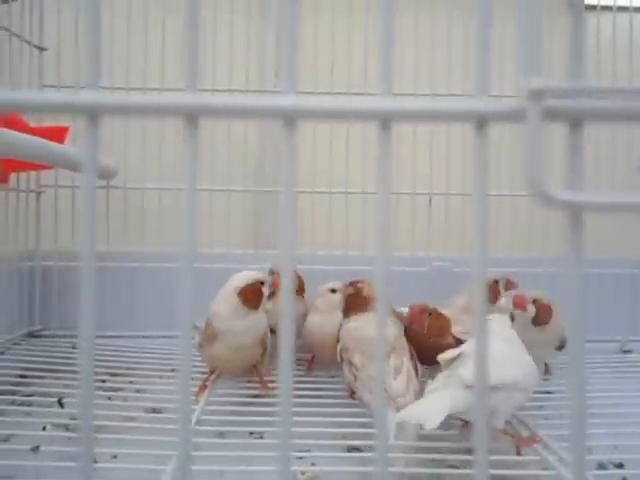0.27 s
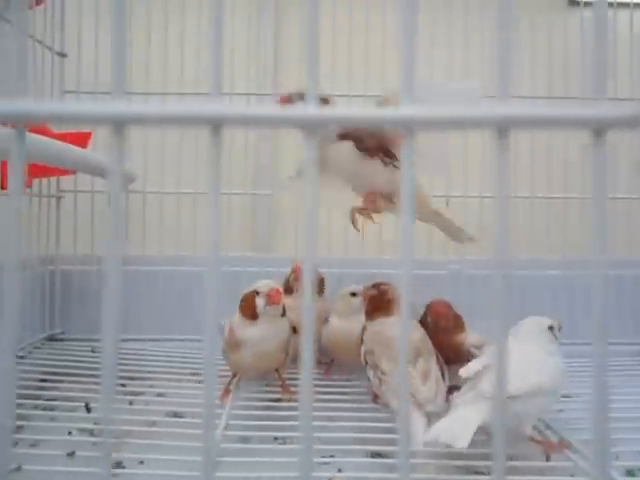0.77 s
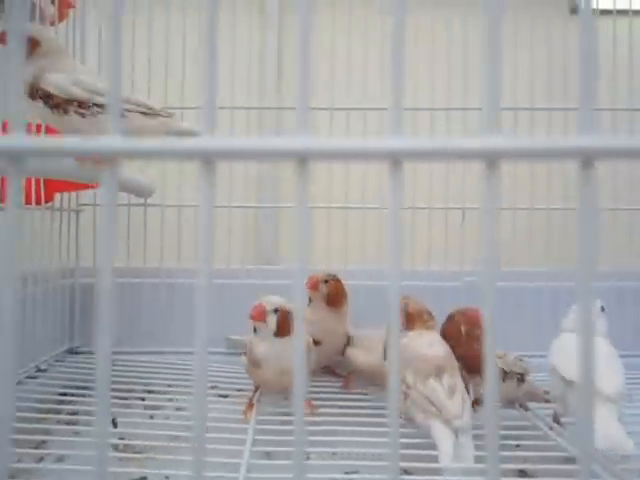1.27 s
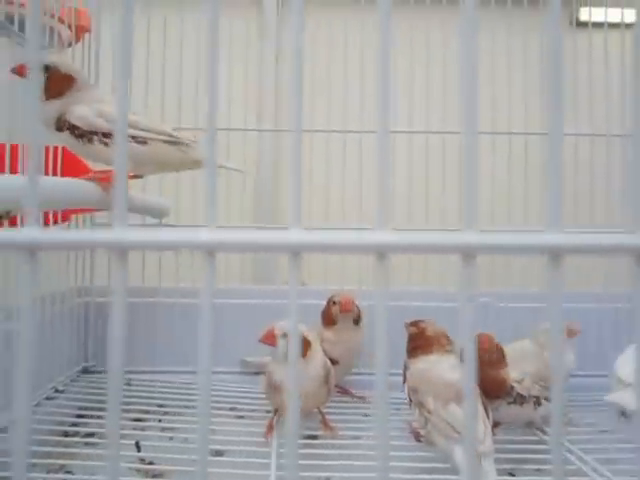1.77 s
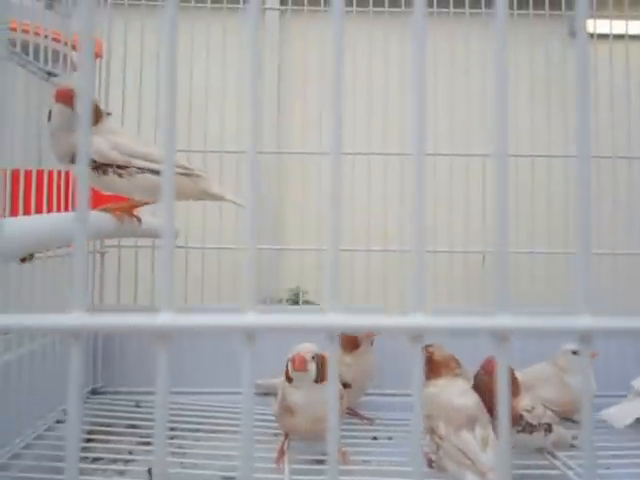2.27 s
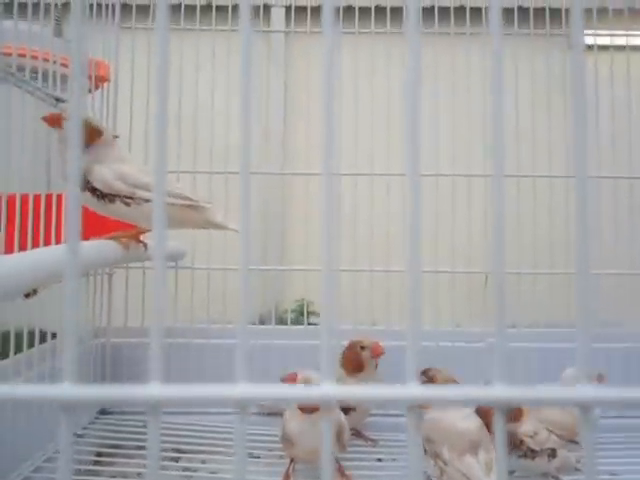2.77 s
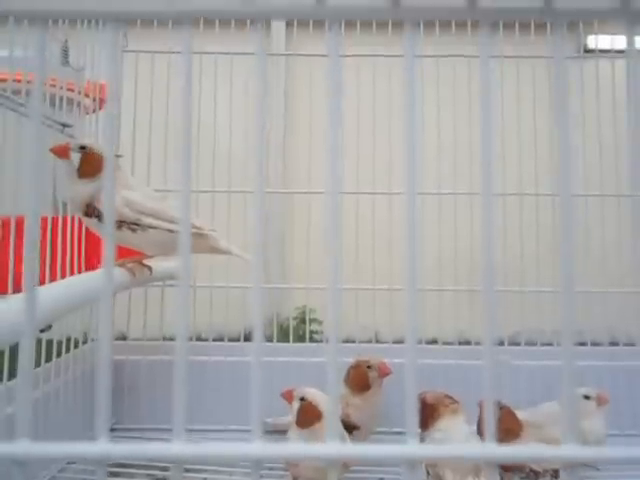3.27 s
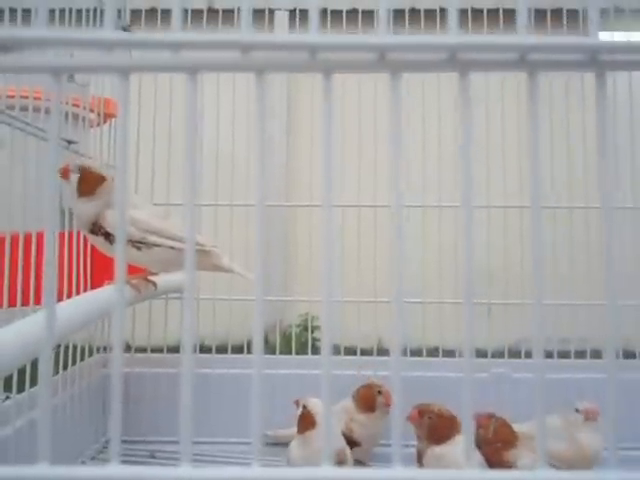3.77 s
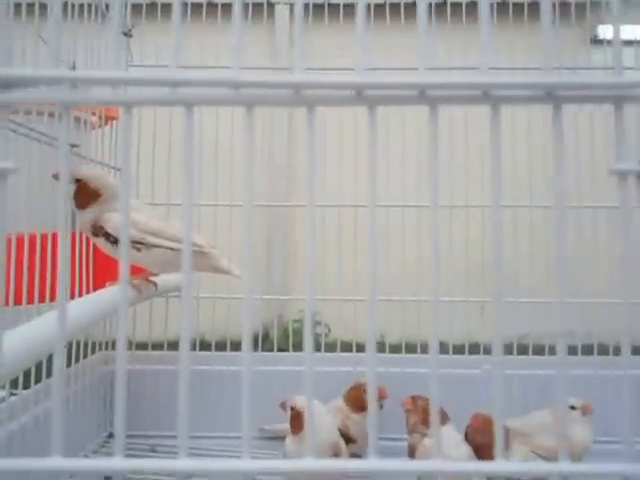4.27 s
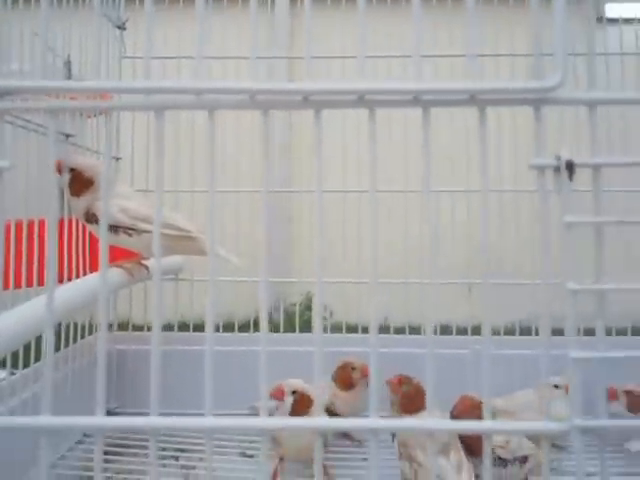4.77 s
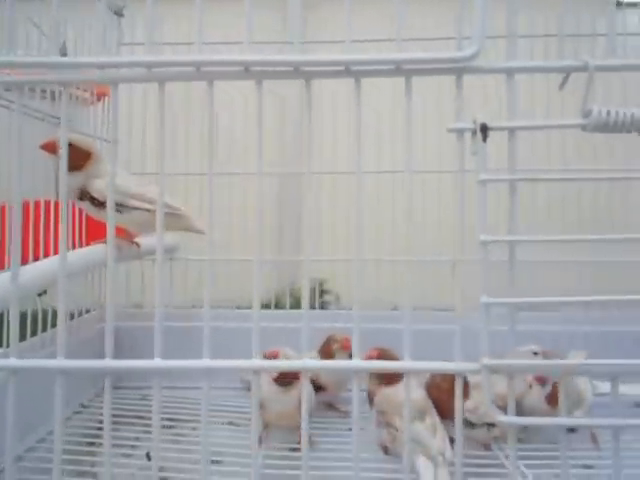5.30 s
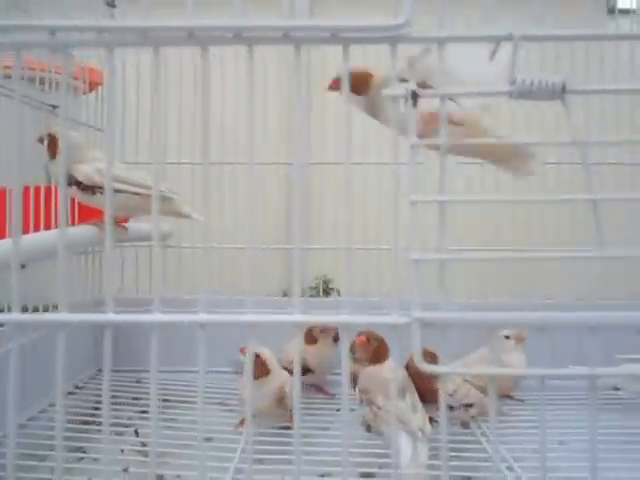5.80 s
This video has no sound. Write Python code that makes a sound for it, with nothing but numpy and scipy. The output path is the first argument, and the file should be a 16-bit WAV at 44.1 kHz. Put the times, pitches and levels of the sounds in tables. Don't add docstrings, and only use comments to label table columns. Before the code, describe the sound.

In a metal cage inside a bird shop, small finches give soft contact notes and sharp, nasal falling calls. Feet click on ringing wires and a bird flutters up early on. A larger bird rattles briefly in the background, others warble and twitter hoarsely, and the end crowds with overlapping calls and a second, stronger wing flutter. Low fan rumble and mains hum throughout; close, dull cheap camera microphone.

```python
import sys
import numpy as np
from scipy import signal
from scipy.fft import rfft, irfft
from scipy.io import wavfile
from scipy.ndimage import uniform_filter1d

SR = 44100
rng = np.random.default_rng(int(sys.argv[2]) if len(sys.argv) > 2 else 0)


def unload_wav(signal):
    wavfile.write(
        sys.argv[1],
        SR,
        np.round(np.clip(np.atleast_2d(signal).T, -1, 1) * 32767).astype(np.int16),
    )


def elevation(decibels):
    levels = np.asarray(decibels, float)
    return 10 ** (levels / 20)


N = 266364

# freq_hz, gain_db
ARCH_THROAT = [(410, -55), (700, -16.5), (1490, -16), (3170, 3), (3900, -5.5), (4250, 0), (4710, -16.5),
               (5450, -17), (7080, -60.5), (12000, -120)]


def curve(table):
    s, *columns = np.transpose(table)
    at = np.arange(int(s[0] * SR), min(int(s[-1] * SR), N))
    return at, [np.interp(at / SR, s, c) for c in columns]


def colour(points, hz):
    f, db = np.transpose(points)
    return elevation(np.interp(np.log(np.maximum(hz, 1)), np.log(f), db))


def walk(rate_hz, size=N):
    k = max(int(SR / rate_hz), 2)
    held = np.repeat(rng.standard_normal(size // k + 3), k)
    return 1.33 * uniform_filter1d(uniform_filter1d(held, k), k)[k:k + size]


def unit(x):
    return x / np.sqrt(np.mean(x ** 2))


def voice(calls, throats, wobble, rasp, flutter_db, chaos=0., lock_s=.014):
    out = np.zeros(N)
    k = np.arange(1, 15)[:, None]
    for table, throat in zip(calls, throats):
        at, (period_s, db) = curve([(s, 1 / hz, db) for s, hz, db in table])
        unlocked = chaos * (table[0][1] > 900) * np.exp(-((at - at[0]) / SR / lock_s) ** 4)
        scatter = 1 + wobble * walk(300, len(at)) + unlocked * walk(1800, len(at))
        hz = scatter / uniform_filter1d(period_s, size=260)
        gains = colour(throat, k / period_s) * (k / period_s < 5500)
        gains = gains / np.sqrt(np.sum(gains ** 2, axis=0) / 2)
        gains = gains * elevation(flutter_db * np.array([walk(90, len(at)) for _ in k]))
        phase = 2 * np.pi * np.cumsum(hz) / SR
        tone = np.sum(gains * np.cos(k * phase + .15 * k ** 2), axis=0)
        out[at] += elevation(db) * tone * (1 + rasp * walk(1500, len(at)))
    return out


def fall(row, rise_s, hold_s, glide, early, length_s, release_s, scoop, sag, droop,
         start_db, top_db, held_db, half_db, floor_db, last_db, fade_db, end_db):
    s, top, floor, db, slowness = row
    let_go, rest = s + rise_s + hold_s, floor * sag
    end = let_go + length_s * slowness
    fall_s = (1 / floor - 1 / top) * 1000 / glide * slowness
    half_hz = 1 / ((1 - early) / top + early / floor)
    return [(s, top * scoop, db + start_db),
            (s + rise_s, top, db + top_db),
            (let_go, top, db + held_db),
            (let_go + fall_s / 2, half_hz, db + half_db),
            (let_go + fall_s, floor, db + floor_db),
            (end, rest, db + last_db),
            (end + release_s / 2, rest * (1 + droop) / 2, db + fade_db),
            (end + release_s, rest * droop, db + end_db)]


def note(row, attack_s, release_s, scoop, bow, droop, start_db, end_db):
    s, length, first, last, db = row
    return [(s, first * scoop, db + start_db),
            (s + attack_s, first, db),
            (s + length / 2, bow * (first + last) / 2, db),
            (s + length - release_s, last, db),
            (s + length, last * droop, db + end_db)]


def slides(table, hoarse):
    out = np.zeros(N)
    for s, length, first, last, db in table:
        at, (share,) = curve([(s, 0), (s + length, 1)])
        wobble, rasp = walk(1500, 2000)[:len(at)], walk(700, 2000)[:len(at)]
        hz = (first + (last - first) * share) * (1 + hoarse * wobble)
        swell = elevation(db + 3.5 + 60 * hoarse * rasp) * np.sin(np.pi * share)
        out[at] += swell * np.sin(2 * np.pi * np.cumsum(hz) / SR)
    return out


def shop():
    # freq_hz, level_db_per_hz
    air_db = [(8.2, -39.5), (14, -6.5), (27, -1.5), (49, -3), (91, -3.5), (123, -8.5), (146, -12),
              (241, -14.5), (273, -18), (309, -18.5), (407, -21.5), (882, -26), (1350, -32.5),
              (2920, -39.5), (5450, -46.5), (7080, -82.5), (12000, -120)]
    # freq_hz, level_db, wander_hz
    hum = [(58.44, -33.5, 3.614), (119.8, -29, 0.3), (239.3, -47, 1.5)]
    hz = np.arange(N // 2 + 1) * SR / N
    air = rfft(rng.standard_normal(N)) * colour(air_db, hz)
    out, swell = 0, walk(0.83)
    for step in range(-1, 19):
        share = np.clip(1 - np.abs(2 * np.log2(np.maximum(hz, 1) / 14) - step), 0, 1)
        out = out + irfft(air * share, N) * elevation(0.63 * swell + 0.83 * walk(6))
    lines = np.zeros(N)
    for f, db, wander in hum:
        level = elevation(db + 0.5 + 0.83 * walk(4.8))
        lines += level * np.sin(2 * np.pi * np.cumsum(f + wander * walk(5)) / SR)
    return elevation(-28.5) * unit(out) + lines


def soft_contacts():
    # start_s, length_s, first_hz, last_hz, level_db
    contacts = [
        (0.102, 0.066, 474.6, 486, -35),
        (.86, .064, 416.4, 405.4, -37.5),
        (1.946, 0.11, 451.7, 448, -36.5),
        (4.753, .09, 443.6, 454, -39),
        (5.677, 0.11, 429, 435, -38.5),
        (1.763, .11, 495, 478.5, -41),
    ]
    bows = [1.035, .99, 1.045, 1.04, .98, 1.005]
    shape = dict(attack_s=.014, release_s=0.018, scoop=0.92, droop=.92, start_db=-6.5, end_db=-7)
    # freq_hz, gain_db; the first also serves the last note
    throats = [
        [(260, -47.5), (450, -7), (984, -7), (1200, -16), (1480, -10), (1640, -21), (1920, -2.5), (2470, -3),
         (2770, -19), (3370, -4.5), (3740, -18.5), (4560, -7), (5450, -26), (7080, -60.5), (12000, -120)],
        [(260, -34.5), (450, -5.5), (1010, -1), (1100, -7), (1770, -9), (2000, -2), (3300, -9), (5450, -20),
         (7080, -54), (12000, -120)],
        [(260, -33), (450, -11), (655, -14.5), (944, -2.5), (1080, -17), (2360, -5.5), (2600, -14),
         (5450, -16.5), (7080, -49), (12000, -120)],
        [(260, -50), (450, -15.5), (934, 1.5), (1130, -9), (1430, -10.5), (1750, -21.5), (2360, 2), (2600, -13),
         (2820, -12.5), (5170, -14), (5450, -29.5), (7080, -59), (12000, -120)],
        [(260, -34), (450, -10), (1510, -22), (1680, -5), (2390, -2.5), (3010, -1), (4290, -6.5), (5450, -22),
         (7080, -61.5), (12000, -120)],
    ]
    calls = [note(r, bow=bow, **shape) for r, bow in zip(contacts, bows)]
    return voice(calls, throats + throats[:1], wobble=0.005, rasp=0.33, flutter_db=1.8)


def hops():
    # start_s, click_db, ring_db, ping_db
    landings = [
        (0.232, -26, -41.5, -67.5),
        (0.402, -23, -22.5, -29),
        (0.692, -25.5, -33, -50.5),
        (0.769, -27, -39, -57),
        (0.803, -22, -27.5, -64),
        (0.997, -26.5, -27.5, -50),
        (1.5079, -28, -42, -50),
        (2.599, -21.5, -26, -36),
        (5.107, -27, -51.5, -43.5),
    ]
    # freq_hz, level_db, t60_s
    frame = [(800, -10, .3), (945, -4, .7), (972, -1, 1.2), (994, -2, 1.6), (1021, -2, 1.3), (1050, -3, .9),
             (1085, -6, .5), (1450, -22, .4), (1960, -14, .8), (3330, -16, .5)]
    # freq_hz, level_db, t60_s
    thin_wires = [(2050, -18, .08), (2700, -22, .05), (3130, -20, .1), (3350, -22, .1), (4200, -22, .05)]
    # freq_hz, level_db, t60_s
    high_ping = [(4730, 0, .08)]
    out, t = np.zeros(N + SR), np.arange(SR) / SR
    claw = signal.butter(1, [900, 4200], "band", fs=SR)
    for s, click_db, ring_db, ping_db in landings:
        scratch = signal.lfilter(*claw, rng.standard_normal(SR))
        hit = elevation(click_db - 4.5) * scratch * (np.exp(-t / 0.0089) + 0.47 * np.exp(-t / 0.039))
        for modes, db in ((frame, ring_db - 14.0), (thin_wires, click_db), (high_ping, ping_db - 4.0)):
            for hz, mode_db, t60 in modes:
                luck = rng.standard_normal(3)
                buzz_db = 4 * walk(70, SR)
                level = elevation(db + mode_db + 1.5 * luck[0] + buzz_db - 60 * t / t60)
                hit += level * np.sin(2 * np.pi * hz * (1 + .004 * luck[1]) * t + .8 * luck[2])
        out[int(s * SR):int(s * SR) + SR] += hit * (1 - np.exp(-t / .0025))
    return out[:N]


def wings():
    # time_s, level_db
    flights = [
        [(0.76, -28), (0.872, -15), (0.926, -15), (0.98, -23.5), (1.006, -28), (1.04, -36)],
        [(5.76, -36), (5.822, -18), (5.878, -12), (5.918, -22), (5.982, -11.5), (6.04, -28)],
    ]
    beats_hz = [24.1, 21.1]
    start_turns = [0.29, 0.606]
    overtones_db = [5, -3.5, -11]
    out = np.zeros(N)
    for table, hz, turns in zip(flights, beats_hz, start_turns):
        at, (db,) = curve(table)
        phase = 2 * np.pi * (hz * (at - at[0]) / SR + turns)
        beat = sum(elevation(g) * np.cos((k + 1) * phase + 0.32 * k) for k, g in enumerate(overtones_db))
        out[at] = elevation(db) * unit(beat) * np.minimum(1, (at - at[0]) / 1500)
    return out


def burst(s, length, db, first, last):
    shares = np.array([0, 0.27, 0.73, 1])
    levels_db = db - 8 * np.array([1, 0, 0, 1])
    return np.transpose([s + length * shares, levels_db, first + (last - first) * shares])


def twitter():
    # start_s, length_s, level_db, first_hz, last_hz
    bursts = [(.765, 0.083, -42, 3200, 3100), (0.952, 0.055, -47, 4800, 4440),
              (0.996, 0.09, -46, 3500, 3750), (2.59, 0.025, -41.5, 3480, 3310),
              (2.622, 0.15, -51, 3280, 3365), (3.04, 0.16, -49.5, 3560, 3570),
              (3.15, .115, -47.5, 3690, 3430), (3.268, 0.15, -61, 3290, 3430), (5.223, .1, -43, 3300, 3600),
              (5.316, .08, -41, 3400, 4150), (5.429, .1, -42, 3200, 3650), (5.5, .12, -50, 3600, 3360),
              (4.85, 0.13, -48, 3300, 3266)]
    scatter = [.07, .07, .12, .12, .1, .08, .1, .1, .17, .17, .16, .14, .15]
    out, t = np.zeros(N), np.arange(500) / SR
    hoarse = walk(2500)
    for row, scale in zip(bursts, scatter):
        at, (db, hz) = curve(burst(*row))
        luck = rng.standard_normal((len(at) // 90, 3))
        for i, (pitch, slide, size) in zip(range(0, len(at), 90), luck):
            span = slice(at[i] - len(t) // 2, at[i] + len(t) // 2)
            bend = pitch + (1 + slide) * (t / t[-1] - .5) + .5 * hoarse[span]
            phase = 2 * np.pi * np.cumsum(hz[i] * np.exp(scale * bend)) / SR
            out[span] += elevation(db[i] + 5.0 + 3.8 * size) * np.hanning(len(t)) * np.sin(phase)
    return out


def far_chirps():
    # start_s, length_s, first_hz, last_hz, level_db
    hoarse_chirps = [(.958, 0.027, 4700, 4660, -45), (.982, .016, 4470, 4030, -45.5),
                     (1.008, 0.013, 3330, 3480, -44), (1.034, 0.015, 3300, 3800, -43),
                     (1.044, .014, 4140, 4330, -46), (1.055, 0.011, 3380, 3590, -47),
                     (1.115, 0.014, 3870, 3830, -48.5), (3.075, .014, 3910, 3620, -49),
                     (3.2, 0.025, 3810, 3690, -46.5), (4.858, 0.0097, 3050, 2180, -40.5),
                     (4.884, .03, 4630, 4680, -47.5), (4.92, .012, 2830, 2780, -42),
                     (4.922, 0.04, 4590, 4570, -48.5), (4.928, 0.011, 2960, 3700, -39),
                     (4.953, .008, 2690, 3700, -40), (4.962, 0.021, 2910, 2800, -40.5),
                     (5.218, .014, 3170, 3250, -47), (5.238, 0.021, 3050, 3620, -44),
                     (5.264, 0.015, 4350, 4980, -43), (5.277, 0.013, 4830, 4800, -42.5),
                     (5.328, .018, 2784, 3250, -41.5), (5.342, .018, 2720, 3830, -42),
                     (5.348, .02, 4165, 4500, -41.5), (5.413, 0.015, 3150, 3250, -45.5),
                     (5.432, 0.021, 2690, 3250, -42.5), (5.453, 0.02, 2940, 3790, -41.5),
                     (5.472, .018, 3350, 3980, -43), (5.486, 0.025, 3960, 3940, -44.5),
                     (5.513, 0.015, 4010, 3930, -45.5), (5.6, 0.013, 3250, 3190, -46.5),
                     (5.616, .012, 3260, 3180, -46)]
    return slides(hoarse_chirps, hoarse=.025)


def squeaks():
    # start_s, length_s, first_hz, last_hz, level_db
    short_slides = [(2.277, 0.0083, 4450, 4050, -25.5), (3.934, .009, 4100, 4250, -28.5),
                    (5.025, .005, 4700, 4000, -26), (5.107, .004, 1700, 2900, -29),
                    (5.018, .006, 2400, 4200, -36), (2.272, 0.0068, 2400, 4000, -36),
                    (1.2, .004, 3100, 3500, -38), (1.359, .004, 3100, 3800, -34),
                    (2.498, .004, 2700, 3700, -40.5), (2.502, .004, 2600, 3600, -39.5)]
    return slides(short_slides, hoarse=.01)


def low_finch():
    # start_s, top_hz, floor_hz, level_db, slowness (1 = usual pace)
    drops = [
        (1.359, 1075, 596, -17.5, 0.96),
        (2.501, 1130, 608, -17.5, 1.04),
        (4.308, 1073, 588.5, -24.5, 0.92),
        (5.764, 1090, 584, -15.5, 1.035),
    ]
    shape = dict(rise_s=0.0099, hold_s=.008, glide=20, early=0.46, length_s=0.068, release_s=.015, scoop=.94, sag=0.96, droop=.93, start_db=-17, top_db=-8, held_db=-0.5, half_db=-0.3, floor_db=-4.5, last_db=-5, fade_db=-10.5, end_db=-27)
    # freq_hz, gain_db
    throats = [
        [(320, -50), (550, -25), (800, -17), (1190, -11.5), (1570, -23), (2320, -21.5), (2950, -3.5),
         (3250, -7), (3570, 0.5), (3900, -10.5), (4300, -8.5), (4720, -14.5), (5450, -22.5), (7080, -45.5),
         (12000, -120)],
        [(320, -44), (550, -12.5), (1230, -8.5), (1540, -23), (1770, -19), (2340, -13), (2870, -5), (3040, 1.5),
         (3310, -0.5), (3860, -4), (4540, -11.5), (5000, -15.5), (5450, -29.5), (7080, -52), (12000, -120)],
        [(550, -11), (1100, 0.5), (1500, -17), (2050, -2), (2450, -15.5), (2900, 1), (3500, -1.5),
         (3800, -15.5), (4350, -1), (4700, -7.5), (4980, -20), (5200, -8.5), (5500, -18)],
        [(320, -44.5), (550, -24), (1130, -17.5), (2030, -16), (2760, -4), (2920, 1), (4670, -11.5),
         (5100, -15.5), (5450, -29.5), (7080, -40), (12000, -120)],
    ]
    return voice([fall(r, **shape) for r in drops], throats, wobble=0.0015, rasp=.07, flutter_db=1.27, chaos=.2)


def rattle():
    # start_s, pitch_hz, level_db, fundamental_db
    ticks = [(1.553, 1492, -40, -2), (1.57, 1450, -50, 2), (1.584, 1270, -39.5, -5.5),
             (1.6, 1574, -39.5, -4), (1.618, 1480, -39, -5), (1.636, 1507, -37, -3.5),
             (1.65, 1603, -37.5, -2), (1.666, 1624, -37, -2), (1.683, 1350, -39, -5),
             (1.699, 1424, -34, -6), (1.715, 1380, -34, -5.5), (1.733, 1428, -33, -6),
             (1.749, 1388, -35, -3), (1.765, 1450, -33.5, -4), (1.781, 1590, -32, -2),
             (1.798, 1570, -32, -0.5), (1.813, 1607, -31.5, -2.5), (1.829, 1334, -30, -6.5),
             (1.847, 1520, -31, -6), (1.865, 1227, -34.5, -2.5), (1.881, 1247, -34.5, -6),
             (1.898, 1297, -35, -7), (1.918, 1277, -39.5, -3)]
    partials_db = [-2.5, -10, -22]
    out = np.zeros(N)
    for s, hz, db, low_db in ticks:
        at, (share,) = curve([(s + .001, 0), (s + .009, 1)])
        wobble = walk(2000, 600)[:len(at)]
        puff = uniform_filter1d(np.diff(rng.standard_normal(601)), 6)[:len(at)]
        rise = .055 * (np.tanh(7 * share - 1.6) - .4)
        phase = 2 * np.pi * np.cumsum(hz * (1 + .035 * wobble + rise)) / SR
        stack = sum(elevation(g) * np.sin((k + 1) * phase) for k, g in enumerate([low_db] + partials_db))
        out[at] += elevation(db + 7) * share * (1 - share) ** 2 * 6 * (stack + 3 * puff)
    return out


def high_finch():
    # start_s, length_s, first_hz, last_hz, level_db
    arches = [
        (2.241, 0.039, 654, 703, -28.5),
        (3.899, 0.038, 774, 756, -25),
        (4.985, 0.039, 751, 738, -22),
        (5.893, 0.039, 747, 764, -24),
    ]
    # start_s, top_hz, floor_hz, level_db, slowness
    drops = [
        (2.284, 1125, 447, -18.5, 0.98),
        (3.944, 1061, 446, -22.5, 0.98),
        (5.030, 1136, 445, -18.5, 1.02),
        (5.928, 1172, 446.5, -18, 1.06),
    ]
    arch_shape = dict(attack_s=0.004, release_s=.008, scoop=0.83, bow=1.025, droop=0.93, start_db=-16, end_db=-11.5)
    fall_shape = dict(rise_s=.004, hold_s=.004, glide=21, early=.49, length_s=0.094, release_s=.019, scoop=.95, sag=1, droop=0.75, start_db=-5.5, top_db=-0.3, held_db=1.5, half_db=-0.5, floor_db=-4, last_db=-5.5, fade_db=-12.5, end_db=-30.5)
    # freq_hz, gain_db
    throats = [ ARCH_THROAT, [(260, -42.5), (450, -22), (750, -20.5), (1290, -22), (2150, -7), (2710, -5),
               (3340, -7), (4070, -3), (4470, -21), (5450, -33.5), (7080, -68.5), (12000, -120)],
               ARCH_THROAT, [(260, -42), (450, -34), (698, -28), (1360, -22), (1660, -25.5), (2200, -13.5),
               (3170, -5.5), (3520, -8.5), (4470, -15.5), (5450, -27.5), (7080, -48.5), (12000, -120)],
               ARCH_THROAT, [(260, -51), (450, -19.5), (878, -11), (1200, -14.5), (1680, -6.5), (2180, 1),
               (2470, -5.5), (2650, 3), (4030, 6.5), (5450, -30.5), (7080, -66), (12000, -120)],
               ARCH_THROAT, [(260, -49), (450, -26.5), (1140, -16), (2090, -10), (2490, 0.5), (3010, 1.5),
               (3780, 2), (4560, -7.5), (5010, -9.5), (5450, -15), (7080, -37), (12000, -120)], ]
    calls = []
    for arch, drop in zip(arches, drops):
        calls += [note(arch, **arch_shape), fall(drop, **fall_shape)]
    return voice(calls, throats, wobble=0.0016, rasp=.07, flutter_db=1.35, chaos=.2, lock_s=.005)


def warbler():
    # start_s, length_s, first_hz, last_hz, level_db
    whistles = [(4.84, .028, 3330, 3100, -34.5), (4.871, 0.031, 3420, 3360, -38),
                (4.888, .033, 2640, 2900, -33), (4.934, .036, 3000, 3600, -42),
                (4.941, 0.016, 2900, 2560, -37.5), (3.1, 0.014, 3520, 3200, -46),
                (3.124, .018, 2800, 3650, -41), (3.236, .028, 3150, 3250, -41),
                (2.7, 0.041, 5200, 5300, -54)]
    shape = dict(attack_s=.006, release_s=0.005, scoop=0.98, bow=1.002, droop=1.01, start_db=-5.5, end_db=-9.5)
    # freq_hz, gain_db
    throat = [(2400, -9), (3700, -0.5), (4700, -21.5), (5500, -29.5)]
    calls = [note(r, **shape) for r in whistles]
    return voice(calls, [throat] * len(calls), wobble=0.006, rasp=0.3, flutter_db=2.5)


def piping_finch():
    # start_s, top_hz, floor_hz, level_db, slowness
    drops = [
        (5.893, 1228, 614, -15.5, 0.96),
    ]
    shape = dict(rise_s=0.0087, hold_s=.03, glide=13.3, early=0.85, length_s=.075, release_s=0.039, scoop=0.93, sag=.997, droop=0.98, start_db=-33.5, top_db=-2, held_db=2, half_db=-5.5, floor_db=-6.5, last_db=-8, fade_db=-8.5, end_db=-27.5)
    # freq_hz, gain_db
    throat = [(600, -36), (1226, -35), (2450, -14.5), (3000, -7), (3450, 8.5), (3720, -19), (4300, -17.5),
              (4900, 1), (5500, -20)]
    return voice([fall(r, **shape) for r in drops], [throat], wobble=.0008, rasp=0.088, flutter_db=1.5)


def cage(x, db):
    t = np.arange(SR // 20) / SR
    tail = rng.standard_normal(len(t)) * elevation(-60 * t / .02) * (t > .0006)
    return x + elevation(db) * signal.fftconvolve(x, tail / np.sqrt(np.sum(tail ** 2)))[:N]


def room(x):
    t = np.arange(SR // 2) / SR
    tail = rng.standard_normal(len(t)) * elevation(-60 * t / 0.71) * np.minimum(1, t / 0.01)
    return signal.fftconvolve(x, tail / np.sqrt(np.sum(tail ** 2)))[:N]


def scene():
    near = soft_contacts() + piping_finch() + hops() + squeaks()
    near += cage(low_finch(), -12) + cage(high_finch(), -16)
    far = cage(warbler() + far_chirps(), -9)
    ticks = rattle()
    distant = twitter()
    wet = elevation(-27.5) * near + elevation(-6) * far + elevation(-5) * ticks + elevation(-8) * distant
    return (near + far + ticks + elevation(-7.5) * distant + room(wet) + wings() + shop())[None]


def low_pass(x):
    return signal.sosfilt(signal.butter(12, 7320, fs=SR, output="sos"), x)


def record(dry):
    # freq_hz, gain_db
    image = [(4800, 0.5), (5500, -10), (6100, -13.5), (6700, -27.5), (7200, -53.5), (7600, -91)]
    step = 4
    long = np.concatenate([dry, dry[:, ::-1]], axis=1)
    hz = np.arange(N + 1) * SR / (2 * N)
    limited = irfft(rfft(long) * (hz < SR / step / 2), 2 * N)
    kept = limited * step * (np.arange(2 * N) % step == 0)
    full = irfft(rfft(kept) * colour(image, hz), 2 * N)[:, :N]
    full = full + elevation(-106.5) * rng.standard_normal(N)
    return low_pass(full)


dry = scene()
out = record(dry)
unload_wav(out)
```